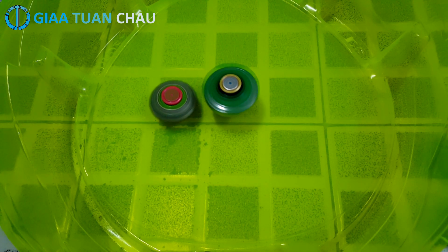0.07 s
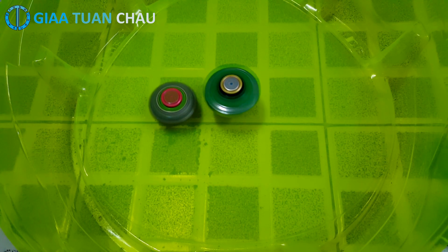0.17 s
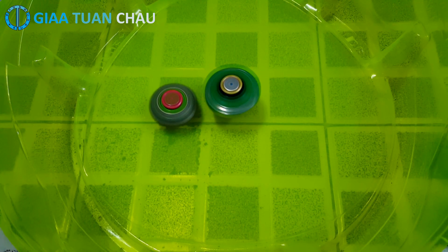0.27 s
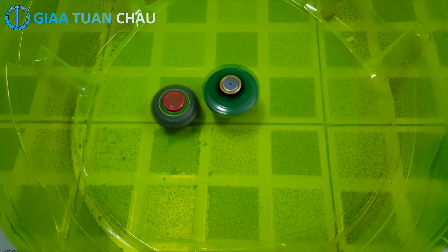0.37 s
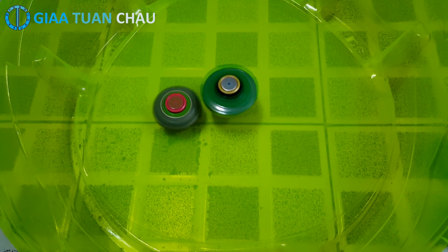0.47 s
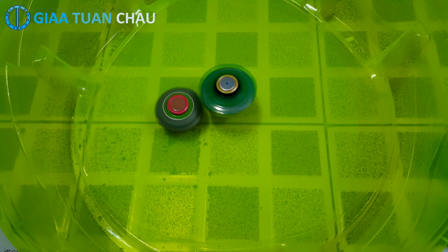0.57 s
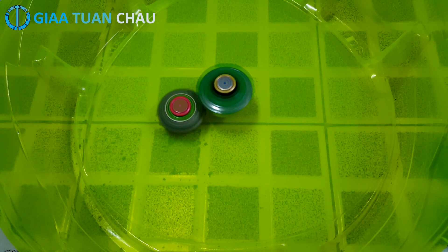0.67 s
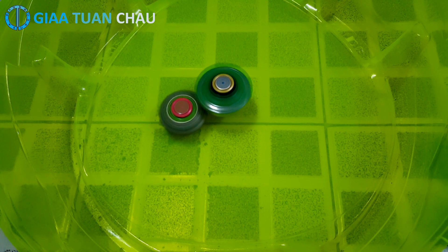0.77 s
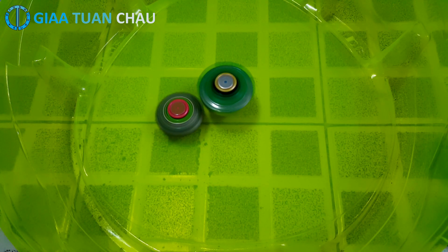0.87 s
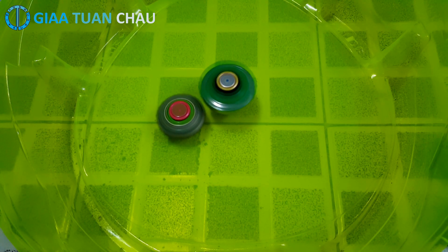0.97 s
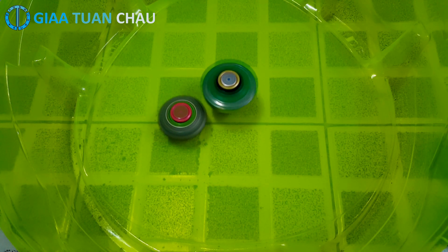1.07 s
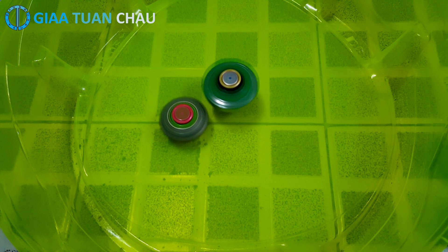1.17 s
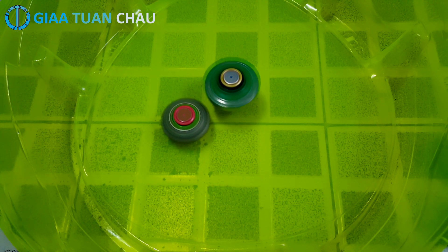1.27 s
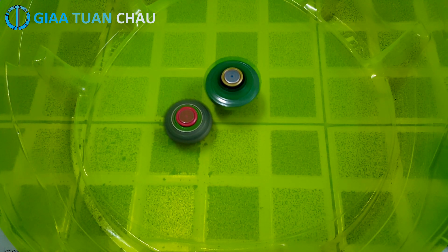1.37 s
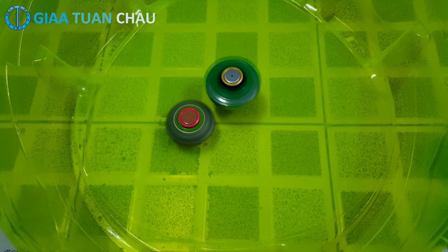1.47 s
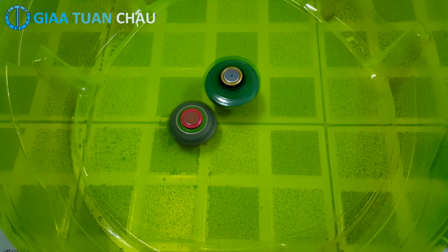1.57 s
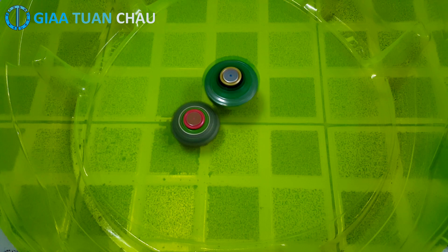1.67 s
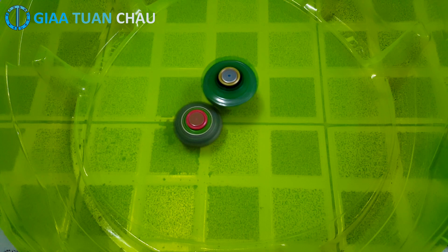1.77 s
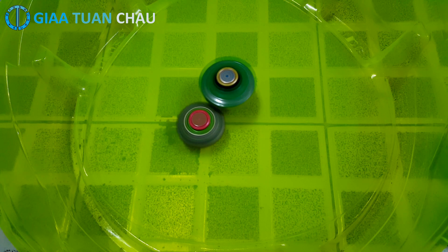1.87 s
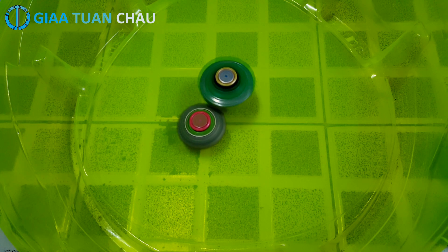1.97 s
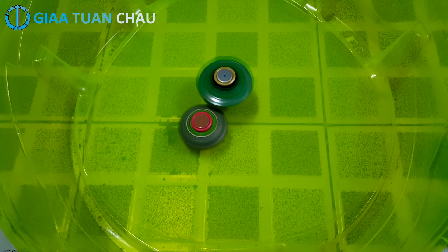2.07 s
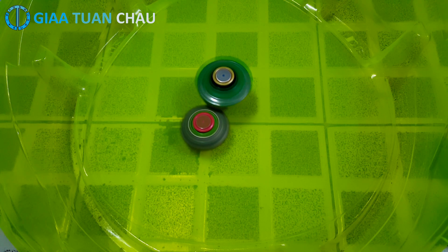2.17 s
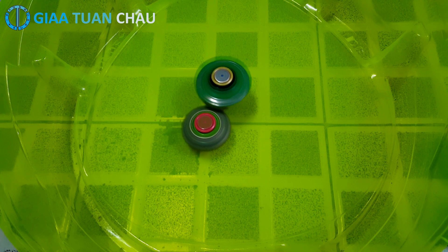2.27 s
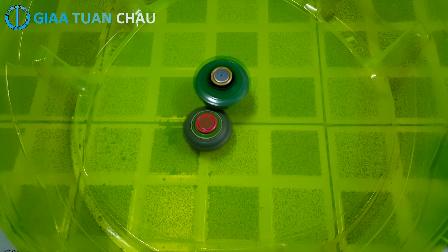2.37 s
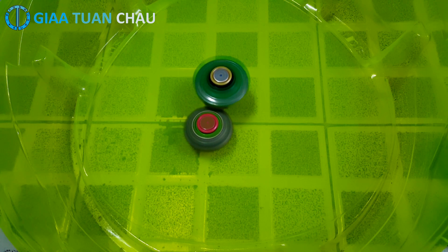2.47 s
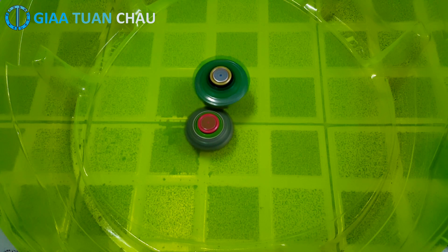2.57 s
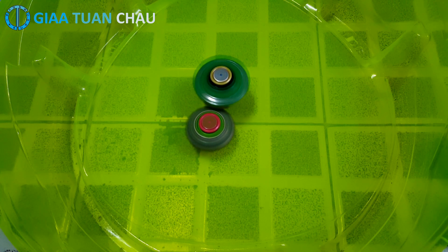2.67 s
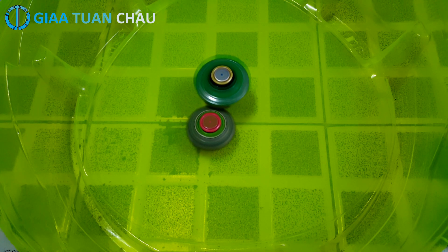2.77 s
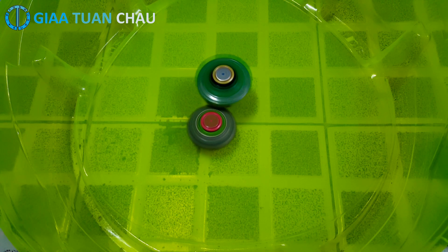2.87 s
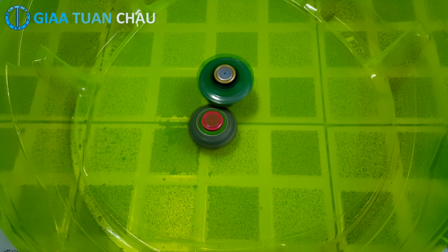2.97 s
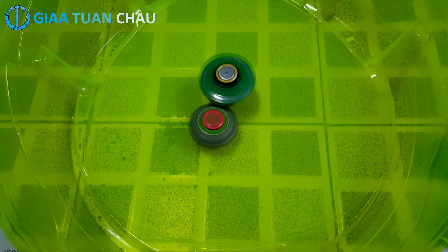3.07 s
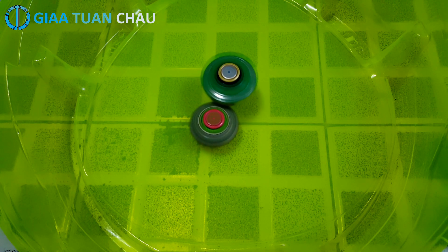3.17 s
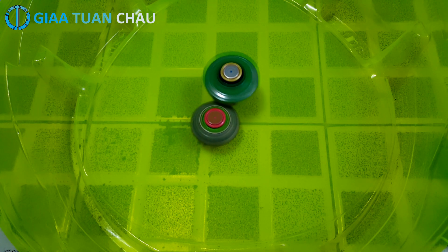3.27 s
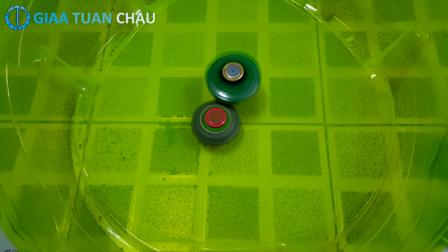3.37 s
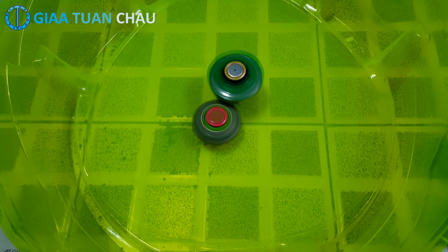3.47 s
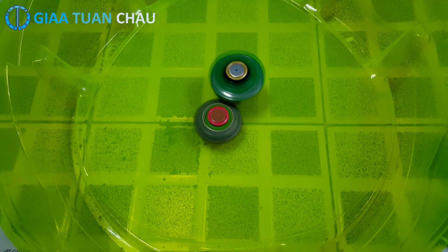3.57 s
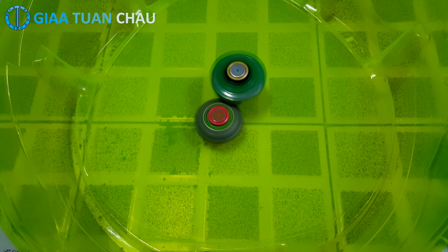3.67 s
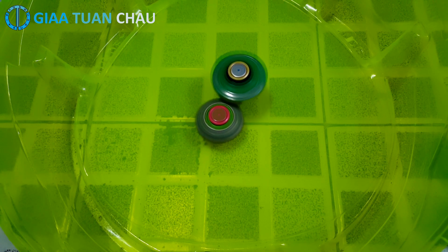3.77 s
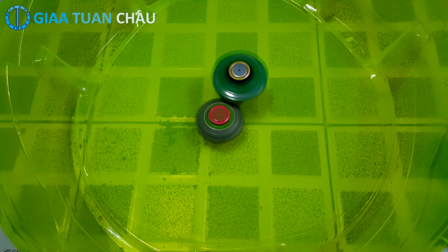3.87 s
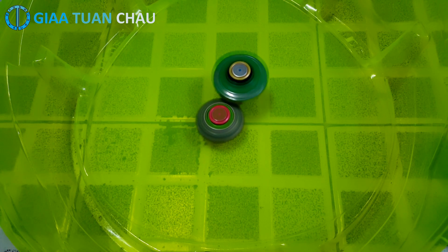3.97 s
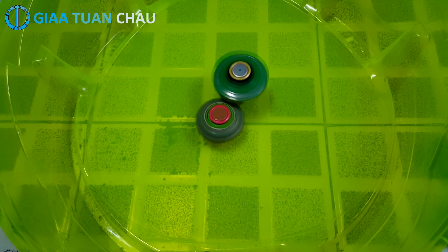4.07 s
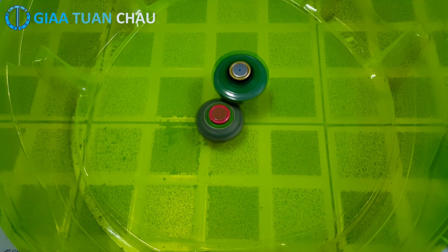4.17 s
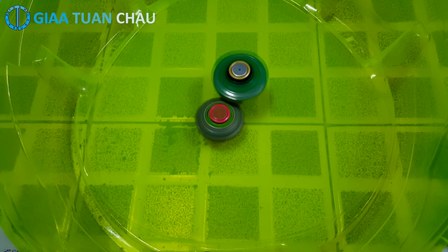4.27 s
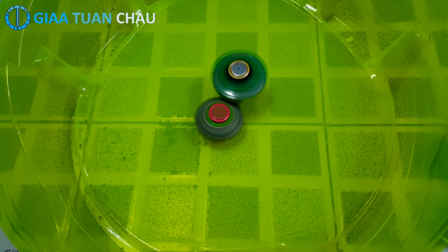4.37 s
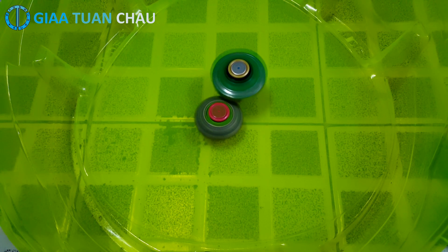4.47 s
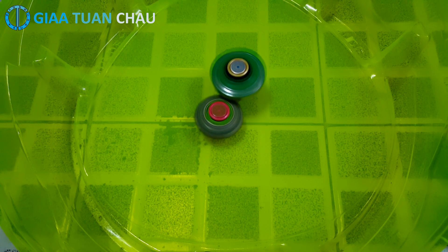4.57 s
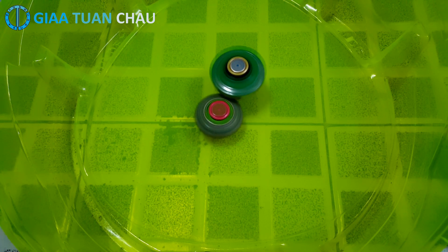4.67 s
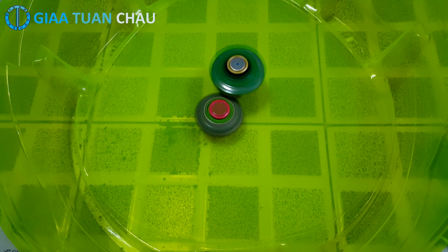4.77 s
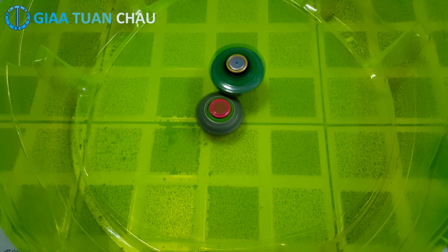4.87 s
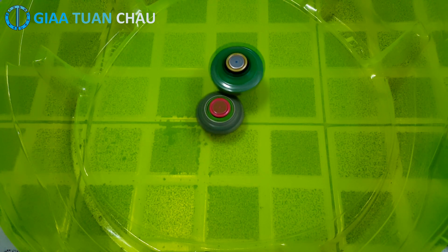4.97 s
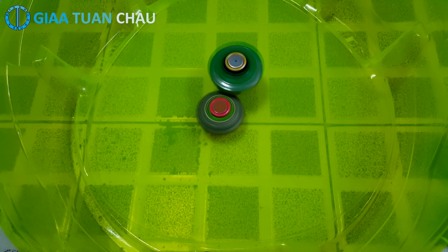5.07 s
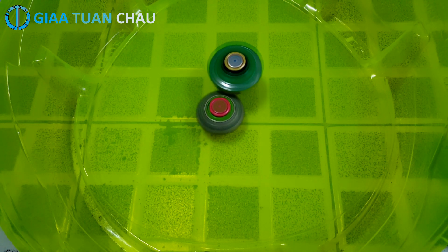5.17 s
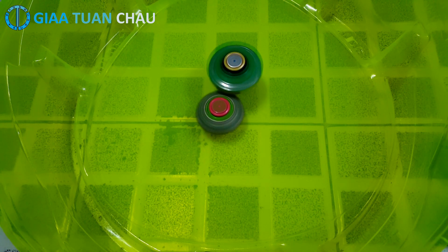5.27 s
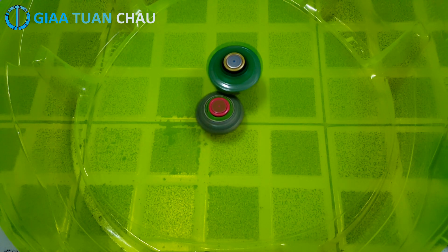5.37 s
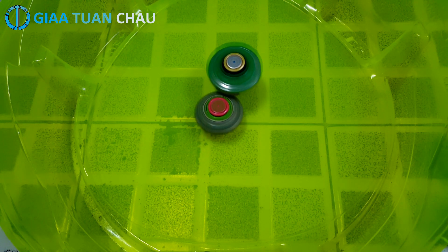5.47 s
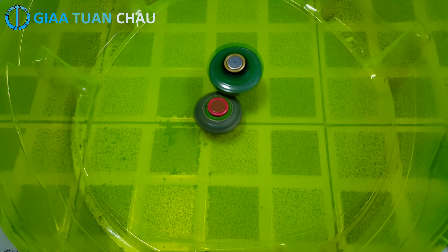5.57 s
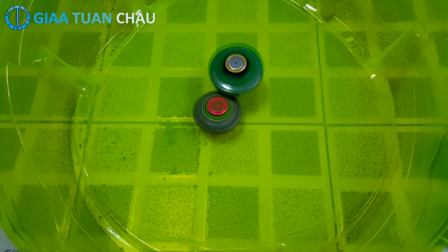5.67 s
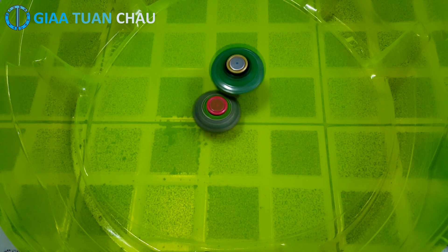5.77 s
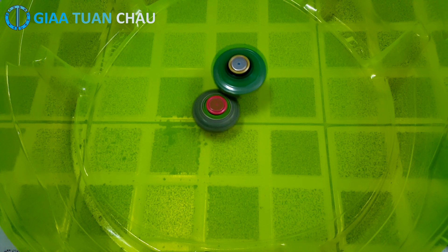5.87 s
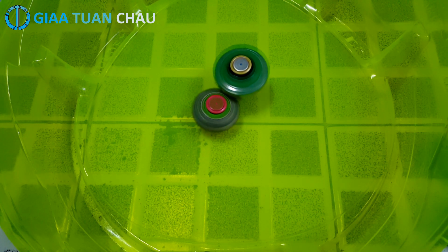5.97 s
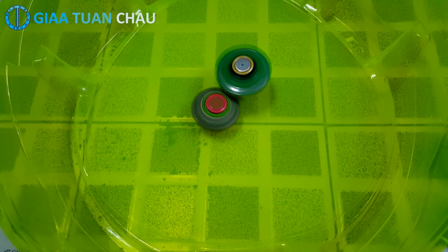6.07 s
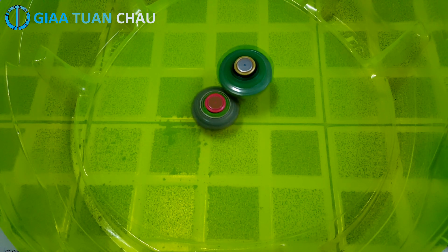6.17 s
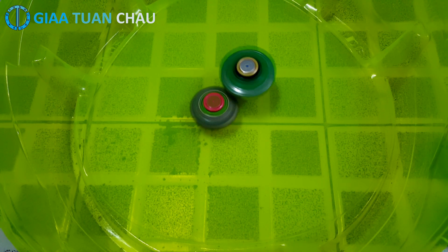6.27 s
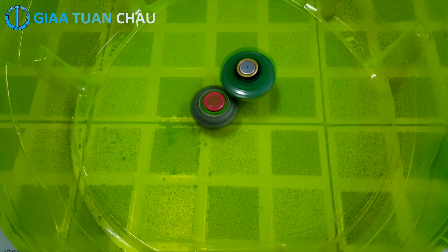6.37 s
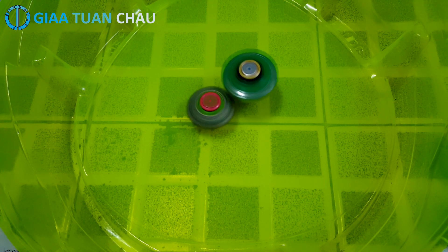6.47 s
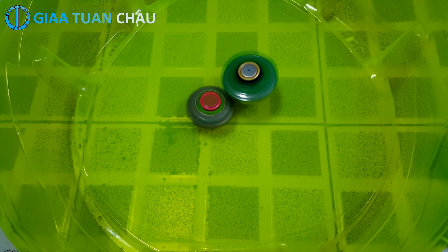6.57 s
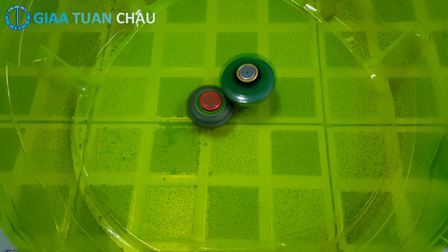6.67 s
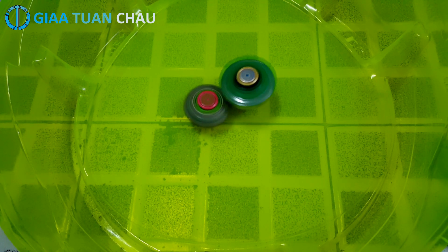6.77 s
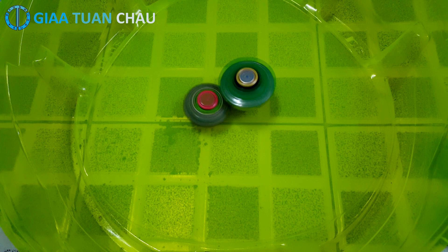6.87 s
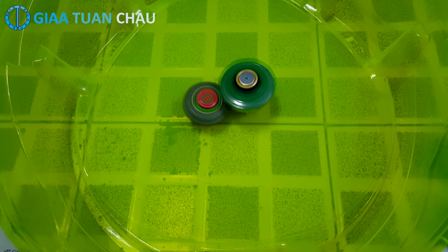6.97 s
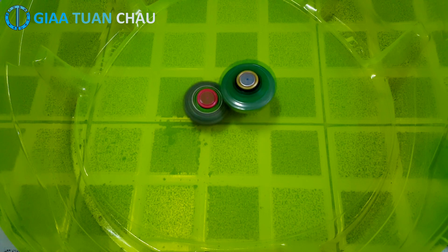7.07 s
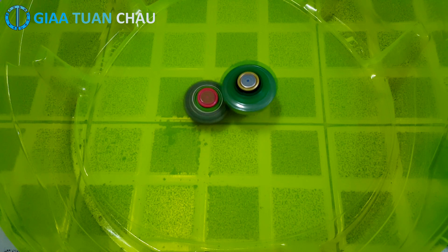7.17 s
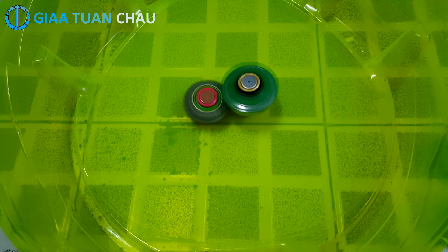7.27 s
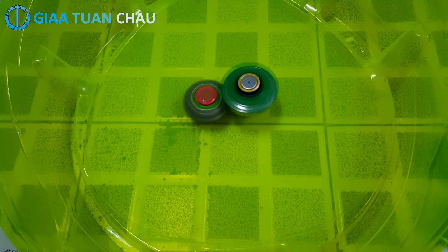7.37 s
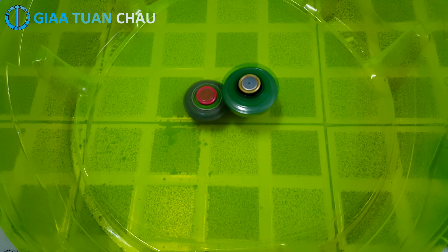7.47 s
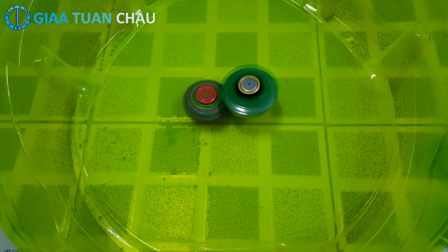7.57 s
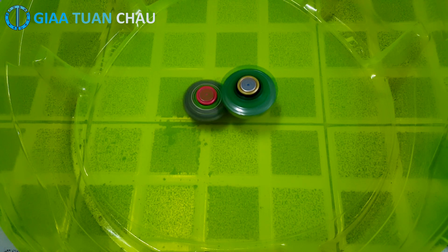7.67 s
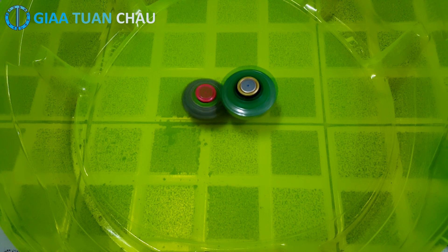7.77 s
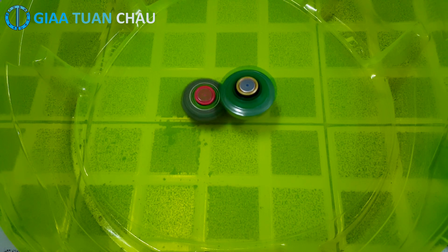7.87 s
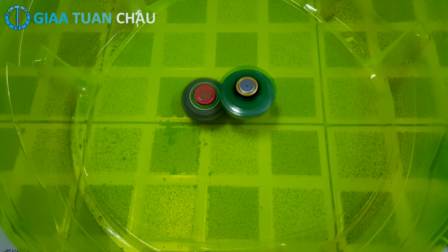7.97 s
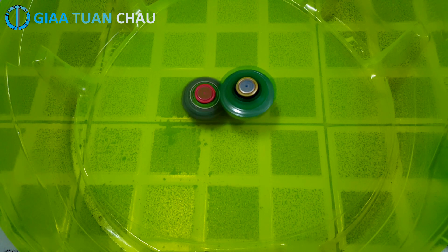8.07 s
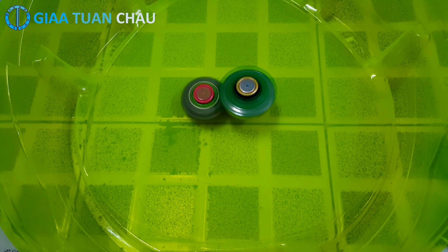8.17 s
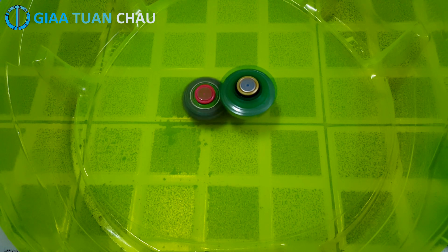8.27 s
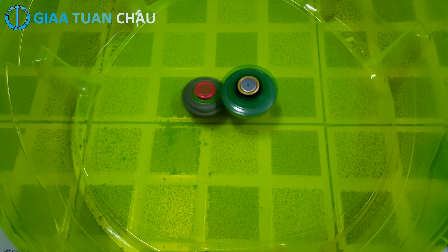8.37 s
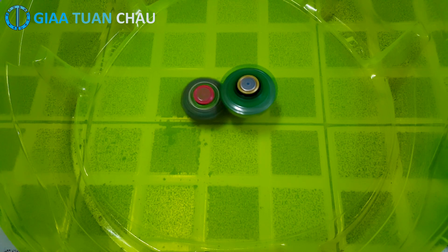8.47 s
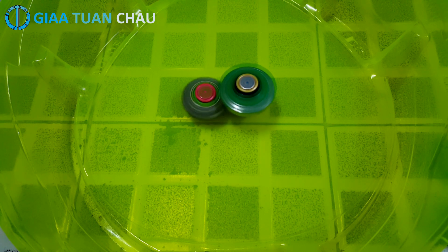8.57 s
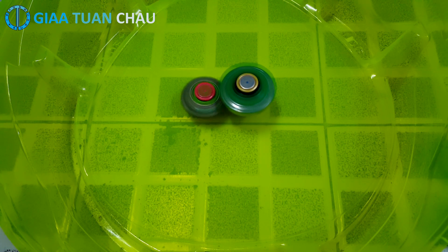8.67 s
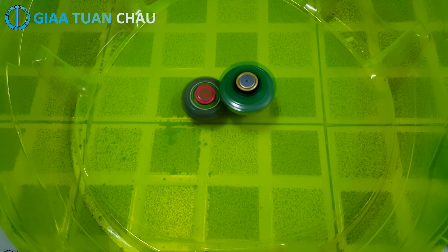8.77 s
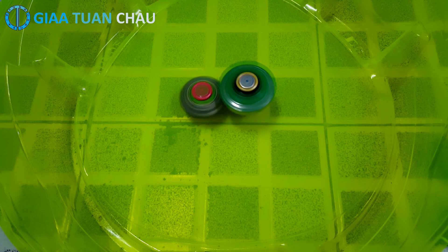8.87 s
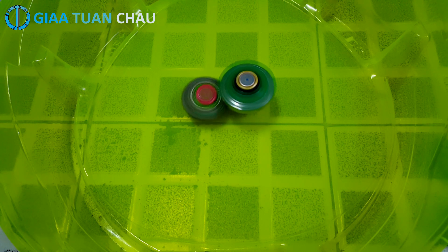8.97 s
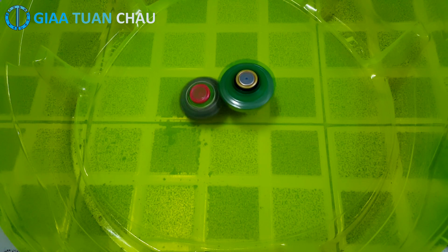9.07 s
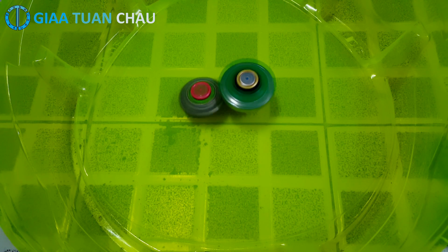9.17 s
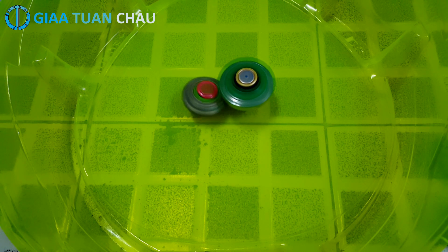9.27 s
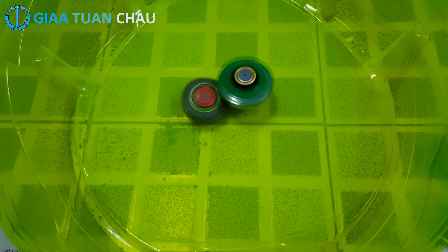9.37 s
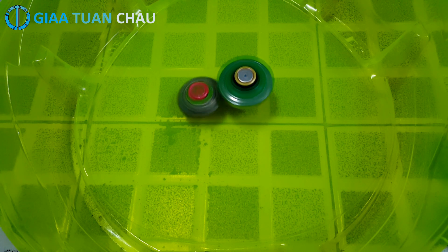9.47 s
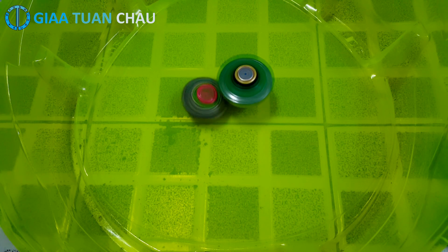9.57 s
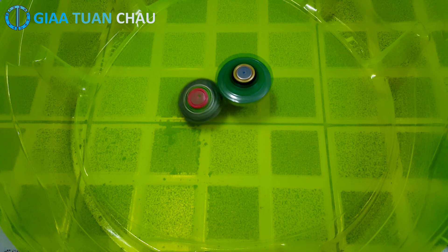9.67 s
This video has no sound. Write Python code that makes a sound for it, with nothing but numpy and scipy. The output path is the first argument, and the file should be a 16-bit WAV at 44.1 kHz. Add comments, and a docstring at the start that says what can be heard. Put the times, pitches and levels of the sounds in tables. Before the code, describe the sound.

Hard, dry clacks of toy tops colliding in a shallow plastic arena speed into a buzzing rattle, then slow into irregular, weaker knocks.

```python
"""Two toy tops spin side by side in a shallow plastic bowl and knock rims, about once a turn.
Each knock is a short scrape of shaped noise whose drive excites the damped modes of the bowl
and of the two metal rims. Sparse decaying echoes give a small hard room. The tips grind on
the bowl as noise through a few bowl modes; a quiet low rumble and microphone hiss lie below."""
import sys
import numpy as np
from scipy import signal
from scipy.fft import rfft, irfft
from scipy.io import wavfile
from scipy.ndimage import uniform_filter1d

SR = 44100
rng = np.random.default_rng(int(sys.argv[2]) if len(sys.argv) > 2 else 0)


def to_wav(s):
    """Save 16-bit WAV."""
    ch = np.atleast_2d(s).T  # columns
    pcm = np.round(np.clip(ch, -1, 1) * 32767)  # PCM
    wavfile.write(sys.argv[1], SR, pcm.astype(np.int16))


N = 428211  # length in samples
SIZE = 8192  # length of one knock in samples
HZ = np.fft.rfftfreq(SIZE, 1 / SR)


def gain_of(db):
    """Decibel law: level to amplitude ratio."""
    return 10 ** (np.asarray(db) / 20)


def evened(x):
    """Normalisation to unit root-mean-square."""
    return x / np.sqrt(np.mean(x ** 2) + 1e-20)


def read(points, hz):
    """Linear interpolation of a curve over log frequency."""
    f, value = np.transpose(points)
    return np.interp(np.log(hz + 1), np.log(f + 1), value)


def add(mix, s, sound):
    """Superposition of a sound onto the mix from time s."""
    part = mix[:, round(s * SR):][:, :sound.shape[1]]
    part += sound[:, :part.shape[1]]


# Weight of side over mid between the microphones: (f/Hz, ratio)
MICROPHONE_SPREAD = [(100, 0.15), (500, 0.31), (1200, 0.63), (2500, 0.68), (8000, 1)]


def both_ears(mid, side):
    """Interchannel coherence: close microphones share the bass, not the treble; works on spectra."""
    apart = read(MICROPHONE_SPREAD, np.fft.rfftfreq(2 * len(mid) - 2, 1 / SR))
    return np.array([mid + apart * side, mid - apart * side]) / np.sqrt(1 + apart ** 2)


# Spectral density of rumble and hiss, relative: (f/Hz, level/dB per Hz)
FLOOR_SPECTRUM = [(15, -42.5), (52, -6.5), (75, -2), (108, -2.5), (175, -9), (260, -14.5), (350, -11.5),
                  (440, -19.5), (570, -16), (1000, -20.5), (2500, -25), (5000, -37.5), (10000, -38.5),
                  (15500, -42)]
# Left-right likeness of the floor: (f/Hz, correlation)
FLOOR_LIKENESS = [(60, 0.96), (240, 0.96), (950, 0.26), (3770, 0.0), (15000, 0)]
# A faint narrow hiss: (f/Hz, width/Hz, level/dB before the channel tilt)
NARROW_HISS = (14750, 120, -92)
FLOOR_DB = -57.5  # before the channel tilt


def floor():
    """Stationary noise: random short-time spectra in patches, coloured wide, plus one narrow band."""
    frames, hz = N // 512 + 5, np.fft.rfftfreq(2048, 1 / SR)
    a, b, c, d, patches = rng.standard_normal((frames, 1025, 5)).T

    # Smoothing over frequency and time makes small patches of level, 1 dB rms
    patches = uniform_filter1d(uniform_filter1d(patches, 6, 0), 6, 1)
    patch_gain = gain_of(evened(patches))

    same = np.clip(read(FLOOR_LIKENESS, hz), -1, 1)[:, None]
    left = a + 1j * b
    right = same * left + np.sqrt(1 - same ** 2) * (c + 1j * d)
    spectra = np.array([left, right]) * patch_gain

    def coloured(colour):
        return evened(signal.istft(spectra * colour[:, None], nperseg=2048, noverlap=1536)[1])

    hiss_hz, width_hz, hiss_db = NARROW_HISS
    wide = gain_of(FLOOR_DB) * coloured(gain_of(read(FLOOR_SPECTRUM, hz)))
    narrow = gain_of(hiss_db) * coloured(np.exp(-((hz - hiss_hz) / width_hz) ** 2))
    return (wide + narrow)[:, :N] * gain_of([[.7], [-.7]])  # channel tilt


def ring(modes):
    """Modal superposition: spectrum of decaying sines, neighbours in opposite sign, each swelling in."""
    hz, db, t60 = np.transpose(modes)[:, :, None]
    t = np.arange(SIZE) / SR
    sign = (-1) ** np.arange(len(modes))[:, None]
    swell = 1 - np.exp(-t * hz / 0.57)  # time constant of 0.57 cycle
    decay = gain_of(db - 60 * t / t60)
    return rfft((sign * swell * decay * np.sin(2 * np.pi * hz * t)).sum(0))


# Level of the tips grinding on the bowl: (t/s, level/dB before the left-right tilt)
GRIND_LEVEL = [(0, -75.5), (1.97, -75), (2.03, -54), (2.07, -36.5), (2.13, -43.5), (2.19, -53), (2.32, -54),
               (2.47, -37), (2.78, -57), (3.15, -40), (3.27, -64), (3.43, -54), (3.55, -49), (3.66, -57.5),
               (3.85, -45.5), (5.3, -55), (6.35, -59.5), (6.8, -63), (6.95, -51), (7.6, -53), (7.76, -69),
               (8.2, -49), (8.36, -77), (8.82, -55), (8.94, -75), (9.2, -63), (9.71, -65)]
# Bowl modes that colour the grind: (f/Hz, relative level/dB, t60/s)
GRIND_BOWL = [(593, -2.5, 0.023), (1078, 2.5, 0.016), (1290, -1, 0.014), (1774, -3.5, 0.012),
              (2050, -4, 0.0087)]


def grind():
    """Source and filter: rough noise from the jolted tips, heard through a few bowl modes."""
    s, level_db = np.transpose(GRIND_LEVEL)
    noise = rng.standard_normal((2, 2 * (N // 2 + 1)))
    rub = irfft(both_ears(*rfft(noise)))[:, :N]
    sound = signal.oaconvolve(rub, irfft(ring(GRIND_BOWL))[None], axes=1)[:, :N]
    return evened(sound) * gain_of(np.interp(np.arange(N) / SR, s, level_db))


# Bowl modes, low to high: (f/Hz, relative level/dB, t60/s)
BOWL_MODES = [(115, -12.5, 0.053), (178.7, -14.5, 0.08), (276, -7, 0.026), (347.5, -16, 0.073),
              (432.2, -17, 0.1), (520, -10, 0.038), (603.3, -4.5, 0.056), (703.6, -5.5, 0.047),
              (807, -14, 0.099), (899.6, -5, 0.05), (1027, -2, 0.027), (1091, -6.5, 0.055),
              (1260, 4, 0.017), (1375, -10.5, 0.0062), (1548, -5, .03), (1734, 3.5, 0.013),
              (1925, 1.5, 0.011), (2083, 1.5, 0.012), (2430, -10.5, 0.012), (2684, -13.5, 0.022),
              (3330, -5, 0.0068), (3906, -6.5, 0.009)]
# Metal rim of the large top: (f/Hz, relative level/dB, t60/s)
LARGE_RIM_MODES = [(9090, 0, .05), (9165, 5, .09), (9240, 0, .04), (13415, 2, .08)]
# Metal rim of the small top: (f/Hz, relative level/dB, t60/s)
SMALL_RIM_MODES = [(6710, -8, .04), (10150, 1, .05), (10215, 5, .08), (10800, -4, .04)]


def ringing_bodies():
    """Modal grouping: spectra of low, middle and high bowl modes, large rim and small rim."""
    low, middle, high = BOWL_MODES[:12], BOWL_MODES[12:15], BOWL_MODES[15:]
    return np.array([ring(modes) for modes in (low, middle, high, LARGE_RIM_MODES, SMALL_RIM_MODES)])


# Relative spectral density of the scrape before its brightness slope: (f/Hz, level/dB per Hz)
SCRAPE_SPECTRUM = [(300, -39), (1000, 1), (2500, -5.5), (4000, -4.5), (4800, -11.5), (5750, -5.5),
                   (7000, -9), (7900, -14), (9200, -8), (12000, -13), (14000, -15), (14950, -10.5),
                   (15600, -22), (16600, -53)]


def knock(bodies, knock_db, low_db, high_db, contact_ms, middle_db, swell_ms, bright_db, large_db, small_db):
    """Impact excitation: a gritty contact of a few ms, and the shudder it sends through bowl and rims."""
    ms, hz = np.arange(SIZE) / SR * 1000, HZ[::4]
    short = SIZE // 4
    # Noise of randomly varying strength: the first part drives the bodies, the rest is the scrape
    roughness = gain_of(1.56 * rng.standard_normal(SIZE + short))
    grit = rng.standard_normal((2, SIZE + short)) * roughness

    # The rims press together, then part rather suddenly
    u = ms[:short] / np.clip(0.61 * contact_ms, .4, 14) + 0.1
    push = (u * np.exp((1 - u ** 1.48) / 1.674)) ** 1.07
    colour = gain_of(read(SCRAPE_SPECTRUM, hz) + bright_db * np.log2((hz + 100) / 5000))
    colour = colour / np.sqrt(np.mean(colour ** 2))
    scrape = irfft(both_ears(*rfft(grit[:, SIZE:])) * colour) * push

    # One clean delayed blow, as a phase slope, then a chatter that swells and dies
    blow = np.exp(-2j * np.pi * HZ * (0.001506 + contact_ms / 2000))
    swell = (1 - np.exp(-ms / np.clip(swell_ms + 0.23 * contact_ms, .5, 30))) ** 2
    chatter = swell * gain_of(-.75 * ms)
    mid, side = rfft(grit[:, :SIZE] * chatter / np.linalg.norm(chatter))
    drive = both_ears(0.61 * blow + 0.7 * mid, 0.85 * side)

    body_gains = gain_of([low_db, low_db + middle_db, high_db, large_db, small_db])
    out = gain_of(5.5) * irfft(drive * (body_gains @ bodies))
    out[:, :short] += gain_of(-12) * scrape
    return gain_of(knock_db) * out


# Knocks of the rims: (t/s, overall level/dB, low bowl modes level/dB, high bowl modes level/dB,
# contact setting/ms); the mode levels are relative, the contact setting is scaled in knock()
RIM_KNOCKS = [(.7871,-6.5,-18,-10,4.4),(.8268,-1.5,-21,-14.5,5.4),(1.4044,-26,-28.5,-23,2.2),(1.412,-31,-34,-19,4.8),
              (1.9885,-6,-17.5,-17.5,6.6),(2.2781,-8.5,-20.5,-15,4),(2.3085,-10.5,-26.5,-26,3),(2.3846,-6.5,-24,-18.5,3.16),
              (2.4917,-8.5,-19.5,-15,3.3),(2.5988,-9.5,-15,-13,4.2),(2.7075,-9.5,-18.5,-14,5.2),(2.739,-9,-27,-26,2),
              (2.8164,-10,-15.5,-15,4.9),(2.9263,-7.5,-20.5,-17.5,3.7),(2.9583,-5,-24.5,-22,2.7),(3.037,-8,-22.5,-20,2.2),
              (3.0693,-9.5,-31,-32,2.8),(3.1467,-4.5,-26,-18.5,4.04),(3.2927,-6.5,-22,-17,2.65),(3.3571,-6,-25.5,-24,3.3),
              (3.3705,-29,-30,-24,1.8),(3.4034,-2,-21.5,-17.5,2.47),(3.6641,-6.5,-23,-13.5,4.2),(3.6988,-6.5,-17.5,-15,4),
              (3.7322,-4.5,-22.5,-19.5,3.35),(3.7991,-28,-21,-11,6.5),(3.8149,-6,-22.5,-20,3),(3.8483,-8.5,-15.5,-13,3.7),
              (3.882,-9,-23.5,-19,4.4),(3.916,-13,-22,-12.5,5.1),(3.9498,-15,-39,-28,4.5),(3.9832,-5,-23,-17.5,2.7),
              (3.998,-6,-25,-20,4.7),(4.0334,-5.5,-22.5,-22,1.8),(4.0675,-8.5,-19,-14.5,3.1),(4.1022,-16,-26,-20,4),
              (4.1363,-11.5,-24,-18,2.8),(4.17,-10.5,-19.5,-20,3),(4.1854,-6,-24.5,-14.5,4.3),(4.2212,-15,-17.5,-17,5.1),
              (4.2555,-8.5,-26,-13.5,6.4),(4.2902,-15,-37.5,-28,3.8),(4.3251,-11.5,-20,-11.5,5.1),(4.3598,-6.5,-24.5,-14,4.5),
              (4.3742,-15,-32,-27,4.3),(4.3946,-13.5,-21.5,-15,4.5),(4.4096,-7,-18.5,-18.5,6.4),(4.4472,-13.5,-27.5,-17,5.3),
              (4.4813,-5.5,-25,-19,3.5),(4.5179,-12.5,-26,-16,3.7),(4.5539,-11,-24,-19.5,5.5),(4.5883,-8.5,-23,-18,8),
              (4.6224,-8,-22,-9.5,7.2),(4.64,-11.5,-21.5,-20,3.8),(4.6779,-7,-30.5,-19.5,2.5),(4.6959,-19,-15,-14,7),
              (4.7137,-4.5,-27.5,-21,3.7),(4.75,-6,-22.5,-22,3.3),(4.7868,-9.5,-18,-13.5,4.5),(4.8232,-9.5,-29,-16,3.9),
              (4.8597,-8.5,-24,-17,2),(4.8965,-4.5,-25.5,-18.5,2.7),(4.9327,-8,-18.5,-12,2.7),(4.9484,-6.5,-30,-16.5,4.2),
              (4.9697,-9,-24.5,-19,3.3),(4.9855,-5,-26.5,-19.5,3.2),(5.0249,-6.5,-26.5,-27.5,3.2),(5.0623,-4.5,-22,-17,2.4),
              (5.0998,-6,-17.5,-17,2.8),(5.1376,-3.5,-25,-16,2.55),(5.1752,-7,-15.5,-18,4),(5.2134,-4,-20.5,-22.5,2.24),
              (5.2512,-6.5,-20.5,-18.5,4.5),(5.2897,-10,-16,-13,5.3),(5.3285,-6.5,-21,-16,5.8),(5.3676,-9,-19,-17.5,3.1),
              (5.4063,-7,-20,-12,5.2),(5.4435,-7,-23,-14,7.3),(5.4849,-13,-17.5,-14.5,3),(5.5222,-6,-22.5,-17,6.1),
              (5.5625,-11.5,-19.5,-11,6),(5.6017,-6,-21.5,-14.5,4.3),(5.6422,-8.5,-22,-13.5,6.6),(5.6653,-9,-39,-16,2.3),
              (5.682,-8.5,-23,-14,5.8),(5.7056,-22,-34,-17,4.1),(5.7227,-3,-23.5,-18,2.24),(5.7398,-28,-10,-3,8.3),
              (5.7639,-5,-30,-19,4.2),(5.7861,-13.5,-18,-15,5.3),(5.8027,-9.5,-26.5,-16,7.2),(5.8267,-8,-21,-10.5,6.6),
              (5.8707,-8.5,-18.5,-14.5,7.3),(5.912,-9,-18,-14.5,6.1),(5.9543,-5.5,-20.5,-20.5,6.1),(5.996,-13,-28,-18,4),
              (6.0183,-13,-27,-15,3.2),(6.038,-5.5,-18.5,-13.5,5.5),(6.0827,-12,-35,-19,3.2),(6.1047,-15,-29,-23,3.8),
              (6.1224,-9.5,-17.5,-9,5.4),(6.1471,-22,-19,-22,3.4),(6.1689,-9.5,-21.5,-14,3.4),(6.1901,-7,-18,-10,7.4),
              (6.2358,-9,-20.5,-19.5,3.05),(6.277,-7,-17.5,-9,9.1),(6.4381,-5,-24,-16,2.95),(6.4807,-5.5,-17.5,-10.5,6.8),
              (6.5703,-35,-4.5,-3,15),(6.7443,-13.5,-22,-11,3.2),(6.7611,-6,-17.5,-12,12.5),(6.8659,-9.5,-21.5,-10.5,3.3),
              (6.8856,-5,-22.5,-15.5,9.2),(6.9364,-6.5,-24.5,-15,5.7),(6.9651,-9,-16.5,-10.5,8.5),(6.9807,-15,-20,-14,10),
              (7.0134,-10,-18,-12.5,11.7),(7.0919,-7.5,-21,-11.5,10.2),(7.1205,-23,-25,-27,4.9),(7.1429,-5.5,-23,-16.5,4.7),
              (7.2231,-5,-18.5,-20,5),(7.3086,-15,-24,-18,2.5),(7.358,-9,-16,-13.5,5.1),(7.4418,-8,-17,-17.5,7.2),
              (7.5277,-9.5,-21,-13,5.9),(7.5597,-11.5,-12.5,-11,5.4),(7.6471,-10.5,-20,-25,2.9),(7.6773,-13,-29,-17,3.2),
              (7.6961,-15,-14.5,-8.5,7.5),(7.7301,-4.5,-19.5,-18.5,4.3),(7.9442,-12.5,-18,-12,5.4),(7.9737,-11.5,-15,-5.5,12.6),
              (7.9818,-13.5,-15.5,-14,6.1),(8.0095,-7.5,-24.5,-19,2.1),(8.0361,-7.5,-17.5,-17,4.7),(8.0702,-8.5,-17.5,-12.5,4.3),
              (8.1395,-16,-20,-14,2.5),(8.1666,-9.5,-19.5,-13.5,5.5),(8.2034,-8.5,-19.5,-18,2.84),(8.2984,-11,-20.5,-15.5,2.4),
              (8.3337,-11,-13.5,-11,5.4),(8.603,-14,-17.5,-8,4.9),(8.6145,-7.5,-16.5,-14.5,2.8),(8.6498,-15,-21,-21,7.6),
              (8.6865,-11.5,-14,-13.5,4.1),(8.7956,-14.5,-24,-23,2.4),(8.8044,-12.5,-21.5,-18,2.7),(8.8253,-11.5,-17.5,-14,4.1),
              (8.8651,-12.5,-13.5,-12,9.5),(9.1727,-12.5,-15.5,-11.5,4.1),(9.2938,-34,-5,-7.5,2.9),(9.3686,-49,-6,-11,2),(9.4335,-17.5,-24,-8,3.2),
              (9.4398,-12,-17,-15,5),(9.452,-22,-6.5,-10,6.6),(9.561,-32.5,-14,-9.5,1.6),(9.6519,-25,-26.5,-19,3.5)]
# Slow drift of the timbre: (t/s, middle over low bowl modes level/dB, bowl swell setting/ms,
# scrape brightness slope/dB per octave, large rim level/dB, small rim level/dB)
TIMBRE_DRIFT = [(.8, 2, 3.8, 2.5, -37, -40), (1.4, 9, 2.7, 2.5, -37.5, -38.5), (2.3, 2, 4, 3, -44, -37),
                (3.1, 5, 3.3, 2, -38.5, -41), (3.7, 4.5, 3.5, 2, -36, -47),
                (4.3, -0.5, 2.2, 3.5, -33.5, -48), (4.75, 3.5, 1.1, 3.5, -39, -34.5),
                (5.15, -5.5, 2.5, 2, -43, -45), (5.6, -2, 2.8, 4, -40, -35), (5.95, -1, 3.8, 4.5, -54, -33),
                (6.4, -4, 1.6, 2, -47, -35), (6.9, 1, 16, 4.5, -38, -36.5), (7.5, -1, 8.7, 1.3, -36, -44),
                (8, -2, 5.3, 4, -40, -41), (8.7, -2.5, 6.2, 2, -42, -41), (9.6, 3, 2.3, 3, -44, -40)]
# Standard deviation from knock to knock, in dB per octave and dB
BRIGHT_SPREAD, RING_SPREAD_DB = 0.72, 2.5


def knocking_tops():
    """Linear superposition of impacts: the direct knocks, and the same dealt in turn to three rooms."""
    tops, room_inputs = np.zeros((2, N)), np.zeros((3, 2, N))
    bodies = ringing_bodies()
    when, *drifts = np.transpose(TIMBRE_DRIFT)
    for k, (s, *row) in enumerate(RIM_KNOCKS):
        middle_db, swell_ms, *colour = (np.interp(s, when, drift) for drift in drifts)
        spread = [BRIGHT_SPREAD, RING_SPREAD_DB, RING_SPREAD_DB]
        colour = colour + rng.standard_normal(len(colour)) * spread
        sound = knock(bodies, *row, middle_db, swell_ms, *colour)
        add(tops, s, sound)
        add(room_inputs[k % 3], s, sound)
    return tops, room_inputs


# Reverberation time of the small hard room: (f/Hz, t60/s)
ROOM_DECAY = [(150, 0.78), (500, 0.34), (1500, 0.26), (4000, 0.3), (12000, 0.26)]


def room(x):
    """Reverberation: sparse echoes of random sign, each band decaying at its own rate."""
    taps = np.zeros((2, SR // 2))
    grid = np.arange(160, SR // 2 - 20, 16)
    at = grid + rng.integers(0, 16, (2, len(grid)))  # one tap at random in every 16 samples
    np.put_along_axis(taps, at, rng.choice([-1., 1.], at.shape), 1)
    hz, t, z = signal.stft(taps, SR, nperseg=256)
    decay = gain_of(-60 * t / read(ROOM_DECAY, hz)[:, None])
    tail = signal.istft(z * decay, SR, nperseg=256)[1]
    tail = irfft(both_ears(*rfft(tail)))
    return signal.oaconvolve(x, tail / np.linalg.norm(tail[0]), axes=1)[:, :N]


def scene():
    """Stereo localisation by level and delay: knocks, room and grind a little to the left, over the floor."""
    background = floor()
    grinding = grind()
    tops, room_inputs = knocking_tops()
    echoes = gain_of(-8) * sum(room(part) for part in room_inputs)
    near = (tops + echoes + grinding) * gain_of([[1.1], [-1.1]])
    return np.array([near[0], np.roll(near[1], 3)]) + background  # right is 3 samples later


def record(dry):
    """Low-pass filtering: the band limit of the recorder, 16600 Hz."""
    lowpass = signal.firwin(255, 16600, window=("kaiser", 9), fs=SR)
    return signal.oaconvolve(dry, lowpass[None], "same")


dry = scene()
out = record(dry)
to_wav(out)
```